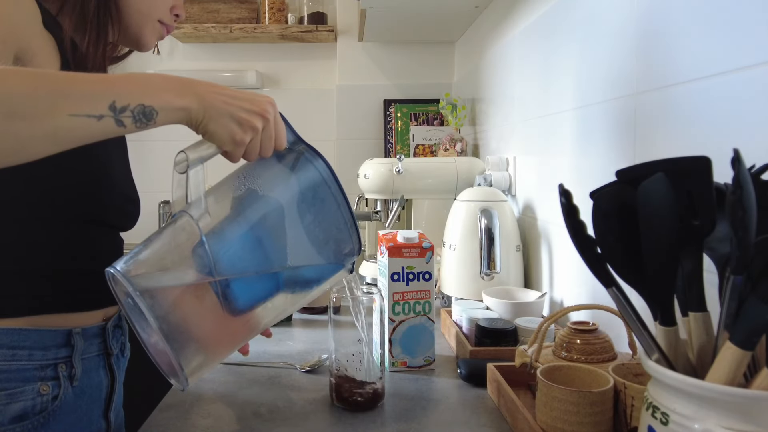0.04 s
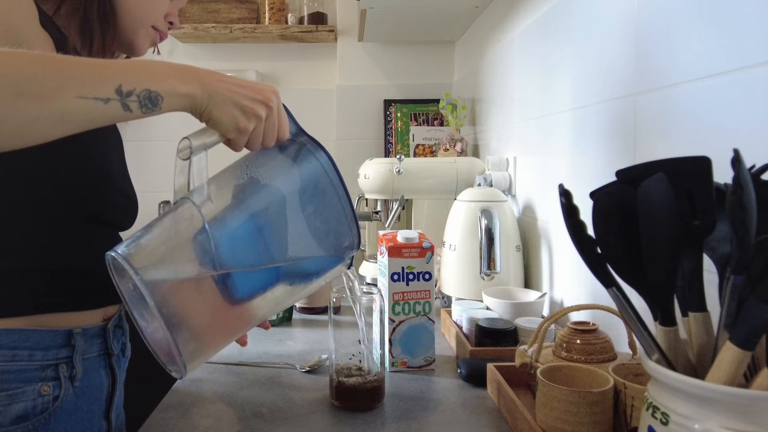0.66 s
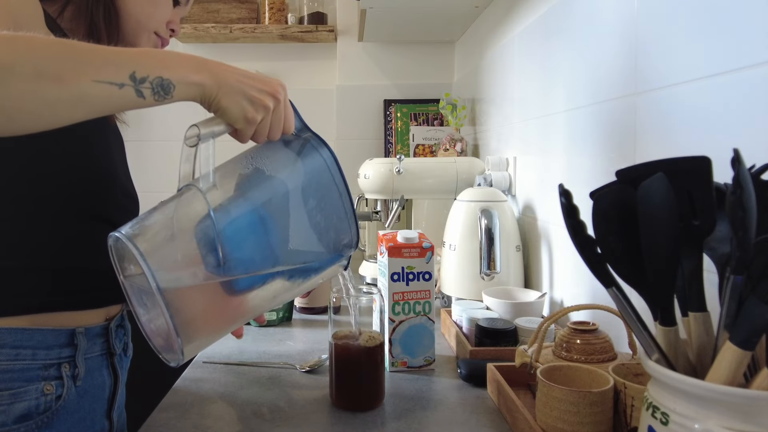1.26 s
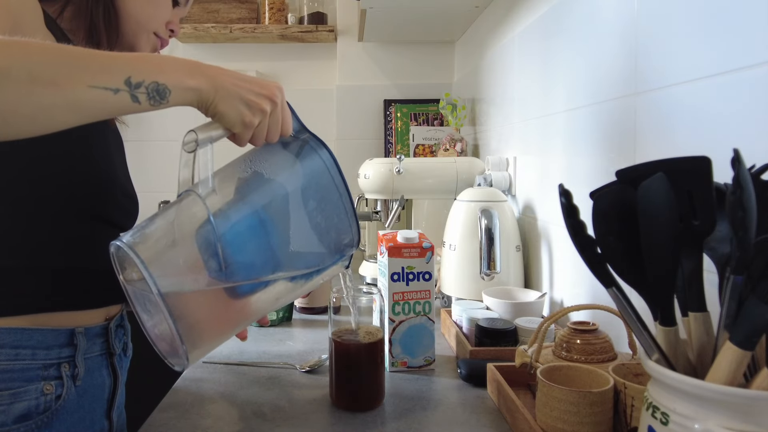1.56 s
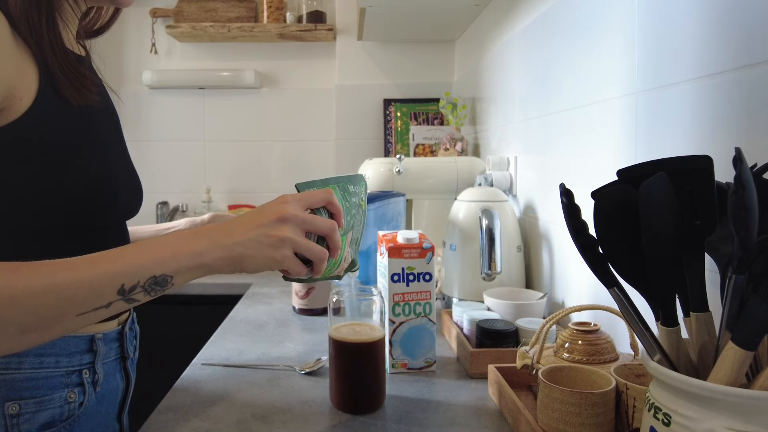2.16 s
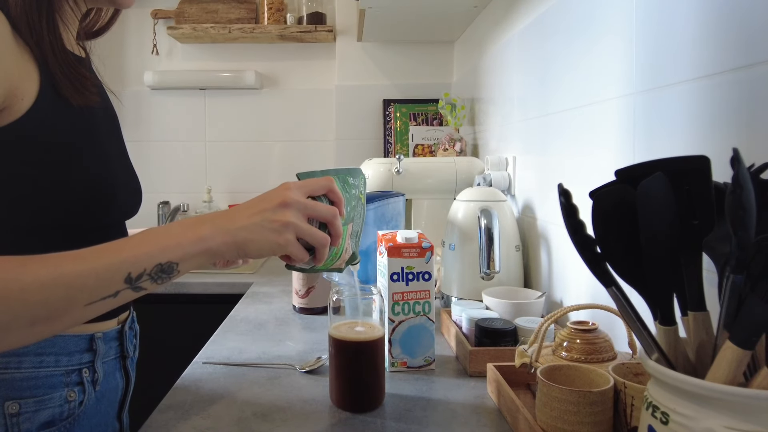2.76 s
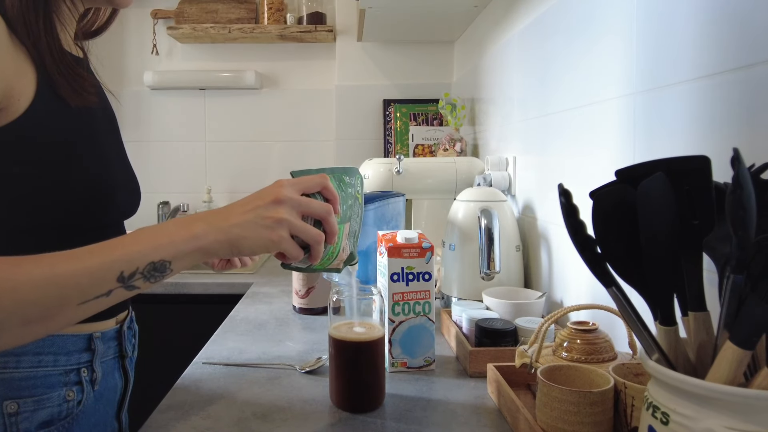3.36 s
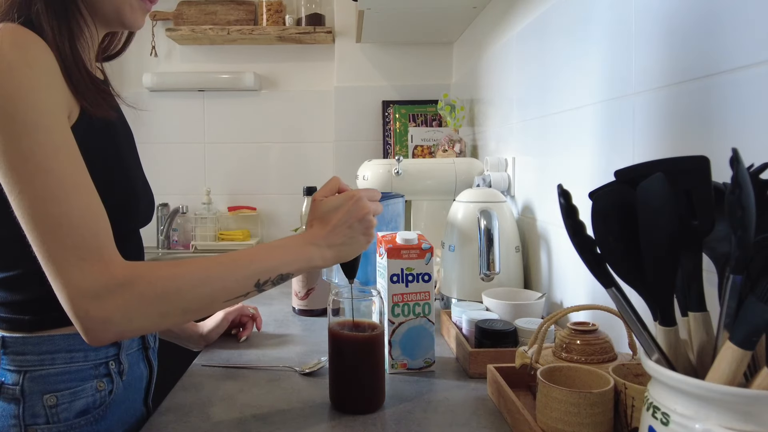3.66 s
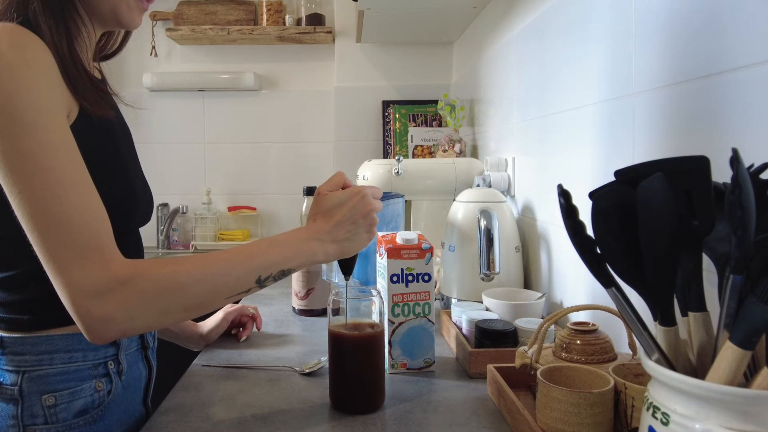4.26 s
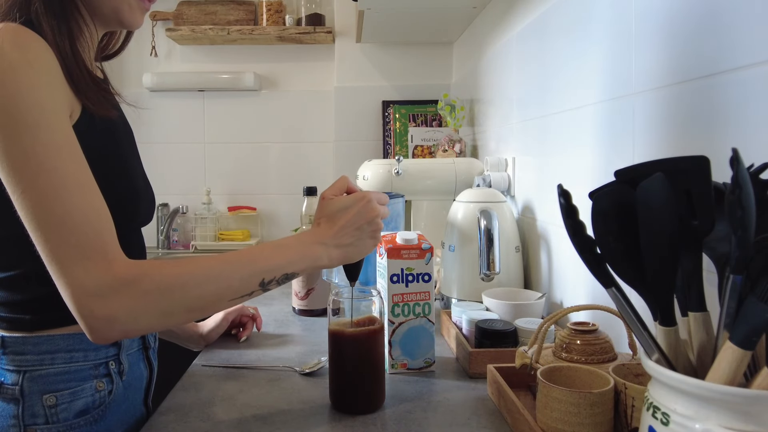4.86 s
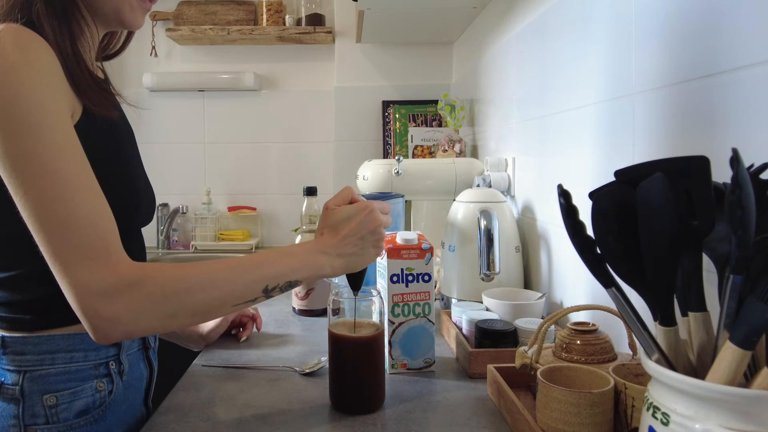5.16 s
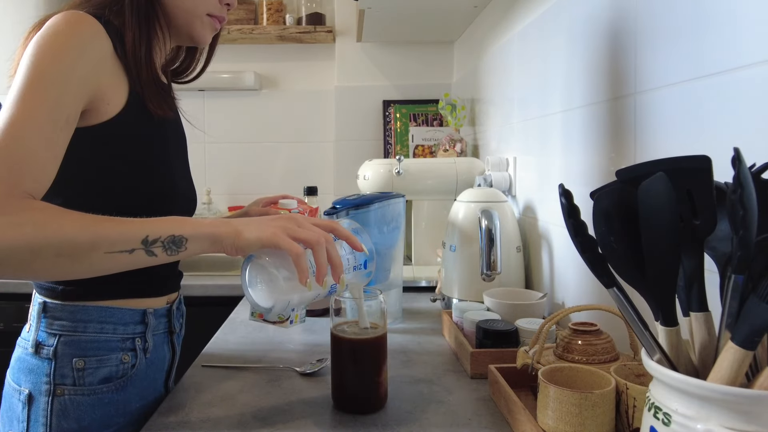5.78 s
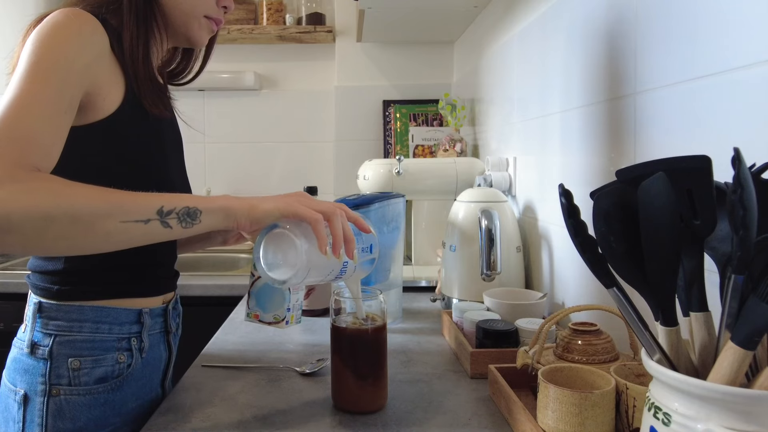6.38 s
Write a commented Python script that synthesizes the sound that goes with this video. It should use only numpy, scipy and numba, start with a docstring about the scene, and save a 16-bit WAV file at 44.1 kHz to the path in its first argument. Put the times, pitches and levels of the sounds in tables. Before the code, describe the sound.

Water splashes and gurgles into a tall glass jar, rising in pitch as it fills, with sharp droplets. It cuts off, and powder trickles in with a faint whisper. The drink is then whisked to a hissing froth in two passes, with dull bumps. Finally a tumbler knocks against the jar several times and gives one short clink. The sounds are close, in a small tiled kitchen with a faint low rumble.

```python
"""Iced coffee on a kitchen counter

Water splashes and gurgles into a tall glass jar, whose air column rises in pitch as it fills.
Powder trickles in, the drink is whisked to a hissing froth, then a tumbler knocks and clinks
against the jar. Each step starts and stops abruptly; a small tiled room rings over a low rumble."""
import sys
import numpy as np
from scipy import signal
from scipy.fft import rfft, irfft, next_fast_len
from scipy.io import wavfile
from numba import njit

SR = 44100
rng = np.random.default_rng(int(sys.argv[2]) if len(sys.argv) > 2 else 0)


def transcribe(u):
    """Save the signal u as a 16-bit wav file named by the first command-line argument.

    u: samples, shape (n,) or (channels, n), limited to [-1, 1]; the rate is SR.
    q: integer samples, one column per channel.
    """
    v = np.clip(np.atleast_2d(u).T, -1, 1)
    q = np.round(v * 32767).astype(np.int16)
    wavfile.write(sys.argv[1], SR, q)


N = 292383

# quarter-wave resonance of the air above the drink: time_s, pitch_hz
AIR_PITCH = [(0, 527), (.36, 598), (.7, 602), (.98, 668), (1.02, 900), (1.28, 876), (1.42, 947),
             (1.95, 1025)]
# modes of the jar's glass wall: pitch_hz, width_hz, gain_db
GLASS_MODES = [(1865, 140, -4), (2830, 49, 8.5), (3156, 74, 6.5), (3240, 36, -10), (4280, 130, 0.5)]


def amp(db):
    """Decibels to gain."""
    return 10 ** (np.asarray(db) / 20)


def unit(x):
    """x at rms 1."""
    return x / np.sqrt(np.mean(x ** 2) + 1e-20)


def peak(x):
    """x with its peak at 1."""
    return x / (np.abs(x).max() + 1e-20)


def along(points, hz):
    """Read (freq_hz, value) points on a log frequency axis."""
    freqs, values = np.transpose(points)
    return np.interp(np.log(hz + 1), np.log(freqs), values)


def curves(rows):
    """One automation curve for each column after the time."""
    times, *columns = np.transpose(rows)
    return [np.interp(np.arange(N) / SR, times, column) for column in columns]


def during(start_s, stop_s):
    """A gate with 8 ms ramps."""
    t = np.arange(N) / SR
    return np.clip(np.minimum(t - start_s, stop_s - t) / .008, 0, 1)


def add(track, start_s, sound):
    """Mix a sound into a track."""
    part = track[..., max(round(start_s * SR), 0):][..., :sound.shape[-1]]
    part += sound[..., :part.shape[-1]]


def colour(x, eq):
    """Minimum-phase EQ through (freq_hz, gain_db) points."""
    n = x.shape[-1]
    size = 2 * next_fast_len(n // 2 + 4096)
    cepstrum = irfft(np.log(amp(along(eq, np.fft.rfftfreq(size, 1 / SR)))))
    cepstrum[1:size // 2] *= 2
    cepstrum[size // 2 + 1:] = 0
    return irfft(rfft(x, size) * np.exp(rfft(cepstrum)), size)[..., :n]


def resonate(x, modes):
    """x through parallel resonances: pitch_hz, width_hz, gain_db."""
    size = next_fast_len(N + 8192)
    f = np.fft.rfftfreq(size, 1 / SR)
    response = sum(amp(db) * 1j * f * width / (hz * hz - f * f + 1j * f * width)
                   for hz, width, db in modes)
    return irfft(rfft(x, size) * response, size)[:N]


@njit
def glide(x, step, radius):
    """A one-pole resonator, retuned every sample."""
    y, z = np.zeros(len(x)), 0j
    for i in range(len(x)):
        z = z * radius * step[i] + 2 * (1 - radius) * x[i]
        y[i] = z.real
    return y


def moving_ring(x, hz, width_hz):
    """x through one resonance that follows a pitch curve."""
    return glide(x, np.exp(2j * np.pi * hz / SR), np.exp(-np.pi * width_hz / SR))


def wavering(hz, stray=.06):
    """A pitch curve that strays at random every 2048 samples."""
    return hz * np.exp(stray * rng.standard_normal(N // 2048 + 1).repeat(2048)[:N])


def wide(source, shared):
    """A stereo texture of rms 1: partly common to both ears, partly each ear's own."""
    return unit(shared * source() + np.array([source(), source()]))


def crackle(per_s, spread_db, smooth):
    """Random tiny impacts of uneven size over a share of smooth noise."""
    hits = rng.random(N) < per_s / SR
    sizes = amp(spread_db * np.minimum(rng.exponential(size=N), 3))
    signs = np.sign(rng.standard_normal(N))
    return unit(hits * sizes * signs) + smooth * rng.standard_normal(N)


def ring(modes, attack_s):
    """One strike on a set of modes: pitch_hz, level_db, t60_s."""
    t = np.arange(SR // 2) / SR
    waves = sum(amp(db + rng.normal(0, 1) - 60 * t / t60_s) * np.sin(2 * np.pi * hz * t)
                for hz, db, t60_s in modes)
    return waves * (1 - np.exp(-t / attack_s))


def burst(eq, t60_s):
    """A dying puff of coloured noise."""
    t = np.arange(SR // 2) / SR
    return colour(amp(-60 * t / t60_s) * rng.standard_normal(len(t)), eq)


def room(x, send_db):
    """The tiled kitchen: direct sound plus a diffuse stereo tail, boosted most in the treble."""
    # reverb time: freq_hz, t60_s
    decay = [(100, 0.43), (1200, 0.64), (4000, 0.5), (12000, 0.24)]
    hz, t, noise = signal.stft(rng.standard_normal((2, SR // 2)), SR, nperseg=256)
    side = noise[1] * np.minimum(hz / 650, 1)[:, None]  # long waves reach both ears alike
    early = 1 + 1.25 * np.exp(-t / .0099)  # counter and wall are close
    ears = np.array([noise[0] + side, noise[0] - side]) * early
    ears *= amp(-60 * t / along(decay, hz)[:, None])
    tail = np.pad(signal.istft(ears, SR, nperseg=256)[1], ((0, 0), (SR // 500, 0)))  # 2 ms pre-delay
    tail *= amp(send_db) / np.linalg.norm(tail[0])
    tail = colour(tail, [(3000, 5.1), (9000, 11.4)])  # tiles throw the treble back
    tail[:, 0] = 1  # direct sound
    return signal.fftconvolve(x[None], tail, axes=1)[:, :len(x)] / np.sqrt(1 + amp(send_db) ** 2 / 2)


def room_tone():
    """A low rumble, nearly alike at both ears, under a faint hush."""
    # spectra of the two beds: freq_hz, gain_db
    rumble_eq = [(27, 0.5), (65, -13.5), (105, -6.5), (150, -25.5), (250, -33), (600, -78.5)]
    hush_eq = [(100, -5.5), (200, -7.5), (340, -16.5), (1000, -23.5), (3500, -22.5), (12000, -32)]
    # the rumble's slow swells: time_s, level_db
    swells = [(0, -57), (1.8, -50.5), (3.1, -57), (3.8, -50), (6.6, -57)]
    rumble = wide(lambda: colour(rng.standard_normal(N), rumble_eq), shared=13.5)
    hush = wide(lambda: colour(rng.standard_normal(N), hush_eq), shared=.9)
    return amp(curves(swells)[0]) * rumble + amp(-63.5) * hush


def powder():
    """Fine grains whisper into the jar; small clumps land and faintly sound its air."""
    # hiss of sliding grains: freq_hz, gain_db
    grit_eq = [(400, -20), (1600, -2), (6000, -3), (10000, -9)]
    # the trickle: time_s, level_db
    trickle = [(2.0, -50.5), (2.154, -59.5), (2.92, -67), (3.104, -61), (3.47, -61)]
    hiss = wide(lambda: colour(rng.standard_normal(N), grit_eq), shared=.45)
    landings = crackle(per_s=40, spread_db=1, smooth=.2)
    air = moving_ring(landings, wavering(curves(AIR_PITCH)[0]), width_hz=50)
    clumps = unit(room(air, send_db=0)) * during(2.25, 3.5)
    return amp(curves(trickle)[0]) * hiss * during(1.965, 3.5) + amp(-69.5) * clumps


def clinks():
    """After a soft low nudge, the tumbler's rim ticks on the jar, then rings."""
    # rim contacts: start_s, ring_db, tick_db, tick_hz
    contacts = [(6.163, -55, -43.5, 3080), (6.180, -34, -41.5, 2340)]
    # the tumbler's modes: pitch_hz, level_db, t60_s
    tumbler_modes = [(108.2, -11.5, 0.46), (269, -9, 0.1), (1221, -8, 0.15), (1287, -2, 0.048)]
    track = np.zeros(N)
    for start_s, ring_db, tick_db, hz in contacts:
        tick = peak(burst([(300, 0), (hz * .75, -9), (hz, 2), (4200, -28), (12000, -50)], t60_s=.03))
        add(track, start_s, amp(ring_db) * ring(tumbler_modes, attack_s=.0007) + amp(tick_db) * tick)
    nudge = ring([(282.4, 0, .19)], attack_s=.018)
    add(track, 6.13, amp(-47) * nudge)
    return room(track, send_db=-3.5)


def blow(ring_db, thump_db, rattle_db):
    """A blow thuds through jar and counter, and the contact rattles."""
    # modes of the jar on the counter: pitch_hz, level_db, t60_s
    thud_modes = [(91, -14.5, 0.12), (121.5, -18.5, 0.15), (295, -6.5, 0.084), (528, 0, 0.082),
                  (558, -10.5, 0.065), (1013, -3, 0.023)]
    # spectra of the impact noises: freq_hz, gain_db
    thump_eq = [(60, -16), (125, -6), (190, 1.5), (260, -11), (450, -6), (750, -18), (1100, -6.5),
                (2000, -33.5), (8000, -42.5)]
    rattle_eq = [(100, -10), (1200, 0), (2900, -2), (3800, -20), (15000, -42)]
    body = amp(ring_db) * ring(thud_modes, attack_s=.0026)
    thump = amp(thump_db) * peak(burst(thump_eq, t60_s=.1))
    rattle = amp(rattle_db) * peak(burst(rattle_eq, t60_s=.02))
    return room(np.pad(body + thump + rattle, (0, SR // 2)), send_db=-4.5)


def knocks():
    """The whisk bumps the jar dully; the tumbler makes it ring, its hardest blow with a glassy click."""
    # whisk on jar: start_s, thump_db
    whisk_bumps = [(3.928, -39), (4.513, -25)]
    # tumbler on jar: start_s, ring_db, rattle_db
    tumbler_hits = [(5.535, -34, -70), (5.545, -18.5, -47), (5.562, -24, -64), (5.620, -29.5, -70),
                    (5.656, -31.5, -31), (5.737, -42.5, -38)]
    track = np.zeros((2, N))
    for start_s, thump_db in whisk_bumps:
        add(track, start_s, blow(thump_db - 7, thump_db, thump_db - 4.5))
    for start_s, ring_db, rattle_db in tumbler_hits:
        add(track, start_s, blow(ring_db, ring_db - 12.5, rattle_db))
    hardest_s = max(tumbler_hits, key=lambda hit: hit[1])[0]
    click = burst([(5500, 4.5), (7500, -5), (14000, -8)], t60_s=.017)
    add(track, hardest_s, amp(-42.5) * room(click, send_db=-1.5))
    return track


def whisk():
    """Whisking tears the surface into froth and spray, rings the jar's wall and shakes the counter."""
    # fader rides for two passes, ahead of the mix trims: time_s, churn_db, froth_db, spray_db
    passes = [
        [(3.5, -57.5, -49.5, -58), (3.69, -63.5, -57.5, -60), (3.905, -52.5, -51, -58),
         (3.928, -41.5, -42, -62), (3.99, -43.5, -49.5, -53.5), (4.2, -68, -69.5, -87)],
        [(4.25, -71, -69, -70), (4.288, -61, -57.5, -60), (4.42, -45.5, -44.5, -53), (4.55, -46.5, -43.5, -43),
         (4.72, -46, -42, -40.5), (4.83, -38.5, -38, -44), (4.92, -47, -48, -57.5), (5.11, -67, -64, -82),
         (5.33, -72, -61, -62)],
    ]
    # spectra of the torn surface: freq_hz, gain_db
    froth_eq = [(200, -8), (800, -1.5), (2400, -2.5), (4600, 0.5), (6600, -3.5), (15000, -24)]
    spray_eq = [(3000, -35), (7000, 3), (15000, 6.5)]
    # a thin ring in the froth climbs, then wanders: time_s, pitch_hz
    thin_pitch = [(3.55, 2500), (3.88, 3310), (4.35, 3030), (4.8, 3150), (5.05, 2730)]
    # resonances of the counter and of a closing whistle: pitch_hz, width_hz, gain_db
    counter_modes = [(117.4, 21, 7), (173, 17, 2.5), (290, 28, 4), (519, 33, 7.5), (1000, 71, 4),
                     (1263, 48, 0)]
    whistle_modes = [(6050, 200, 0), (11000, 900, -5)]
    fizz = lambda: crackle(per_s=7000, spread_db=3, smooth=.8)
    froth = wide(lambda: colour(fizz(), froth_eq), shared=.75)
    glass = resonate(crackle(per_s=1500, spread_db=1.5, smooth=.27), GLASS_MODES)
    wall = unit(room(glass, send_db=-12))
    spray = wide(lambda: colour(fizz(), spray_eq), shared=.14)
    counter = resonate(crackle(per_s=900, spread_db=2, smooth=.088), counter_modes)
    churn = unit(room(colour(counter, [(1400, 2.5), (3000, -12)]), send_db=-2))
    thin = wide(lambda: moving_ring(fizz(), wavering(curves(thin_pitch)[0]), width_hz=105), shared=.85)
    hiss = amp(1.5) * froth + amp(-6.5) * thin + amp(-7) * wall
    churn_db, froth_db, spray_db = curves(np.vstack(passes))
    mix = amp(froth_db) * hiss + amp(spray_db + 3.5) * spray + amp(churn_db + 1.5) * churn
    add(mix, 3.613, amp(-42) * ring([(2400, 0, .028)], attack_s=.002))  # one larger bubble pops
    whistle = wide(lambda: resonate(fizz(), whistle_modes), shared=1)
    return mix * during(3.494, 5.342) + amp(-60) * whistle * during(5.17, 5.34)


def droplets():
    """Single droplets snap on the glass and ping at their own pitch."""
    # the loudest droplets: start_s, level_db, pitch_hz, edge_db
    hits = [(0.0292, -27, 3270, -33), (0.056, -31, 5250, -33), (0.086, -30.5, 5600, -58),
            (0.1368, -25, 5000, -52), (.188, -23, 3370, -56), (0.2563, -22, 4300, -56),
            (0.4234, -20, 5450, -25.5), (0.4932, -26.5, 3030, -20), (0.6727, -24, 3000, -33.5),
            (0.824, -27.5, 3350, -53), (.876, -37, 3040, -36.5), (.914, -35, 2800, -42),
            (.971, -28, 3040, -35), (1.1459, -29, 5100, -33), (1.304, -29.5, 3670, -39),
            (1.4222, -27, 4160, -61), (1.514, -41, 3140, -43), (1.5585, -34, 2740, -44),
            (1.6228, -32.5, 4800, -62), (1.765, -40.5, 3270, -56), (1.8927, -43, 6100, -33)]
    track = np.zeros(N)
    for start_s, level_db, hz, edge_db in hits:
        ping = ring([(hz, 0, .011)], attack_s=.0002)
        snap = peak(burst([(hz / 3, -12), (hz, 0), (hz * 1.3, -5), (hz * 2, -24)], t60_s=.022))
        edge = peak(burst([(3000, -16), (9000, .5), (15000, -3.5)], t60_s=.011))
        add(track, start_s, amp(level_db) * (amp(-9) * ping + amp(-2) * snap) + amp(edge_db) * edge)
    return room(track, send_db=-5) * during(-1, 1.975)


def gulps():
    """Big pockets of air, driven under the surface, gulp and sound the jar's air column."""
    # air pockets: start_s, level_db
    pockets = [(.519, -35.5), (0.667, -31.5), (.702, -30.5), (.975, -25.5), (1.053, -30.5), (1.145, -29),
               (1.385, -30), (1.421, -29.5), (1.515, -30), (1.818, -32), (1.944, -33.5)]
    # a gulp's low body: pitch_hz, level_db, t60_s
    body_modes = [(118.3, -5, 0.1), (514, -3, 0.046)]
    track = np.zeros(N)
    for start_s, level_db in pockets:
        air_hz = np.interp(start_s, *np.transpose(AIR_PITCH))
        body = ring(body_modes + [(air_hz, -5, .035), (3 * air_hz, -14.5, .035)], attack_s=.0008)
        splat = peak(burst([(1100, -.5), (3000, -13), (7000, -27)], t60_s=.043))
        add(track, start_s, amp(level_db) * (body + .5 * splat))
    return room(track, send_db=-3.5) * during(-1, 1.975)


def bubbles(hz, scatter, cycles, rise, spread_db, count, samples):
    """Bubbles over the first 2 s: sines that rise in pitch and fall to 1/e in `cycles` periods."""
    when, tuning, size = np.hsplit(rng.random((count, 3)), 3)
    pitch_hz = hz * np.exp(scatter * (2 * tuning - 1))
    phase = pitch_hz * np.arange(samples) / SR
    age = phase / cycles
    gain = amp(-spread_db * np.log(np.maximum(size, .04)))
    waves = gain * np.exp(-age) * np.sin(2 * np.pi * phase * (1 + rise * np.minimum(age, 2)))
    at = (when * 2 * SR).astype(int) + np.arange(samples)
    return unit(np.bincount(at.ravel(), waves.ravel(), N)) * np.sqrt(2 * SR / N)


def air_column(x, harmonic, width_hz):
    """The air above the drink rings at an odd multiple of its quarter-wave pitch."""
    return moving_ring(x, harmonic * curves(AIR_PITCH)[0], width_hz)


def slosh(end_s=1.005, swell_db_per_s=23):
    """A low slosh swells under the early pour, then stops abruptly."""
    # spectrum of shallow water: freq_hz, gain_db
    slosh_eq = [(220, -24), (310, 2.5), (420, -6), (480, -8), (800, -44)]
    water = colour(crackle(per_s=310, spread_db=5.5, smooth=.25), slosh_eq)
    level_db = -45.5 + swell_db_per_s * np.minimum(np.arange(N) / SR - end_s, 0)
    return amp(level_db) * unit(room(water, send_db=-7)) * during(-1, end_s)


def pour():
    """The stream splashes, traps bubbles and drums on the counter: less splash, more drum as it fills."""
    # how hard the stream plunges: time_s, gurgle_db
    plunge = [(.04, -64), (.22, -49.5), (.47, -48.5), (.53, -40), (.97, -40.5), (1.07, -46.5), (1.26, -42),
              (1.36, -46.5), (1.41, -41), (1.79, -47), (1.835, -46), (1.96, -40)]
    # spectra of surface, trapped air and counter: freq_hz, gain_db
    splash_eq = [(400, -5.5), (1500, 1.5), (2500, -17), (2950, 2.5), (3700, -9), (5400, -1.5), (7000, -9),
                 (15500, -6)]
    gurgle_eq = [(330, -18), (480, -4.5), (545, -1), (700, -14.5), (1300, -8), (2500, -20), (6000, -82)]
    thrum_eq = [(30, -25), (85, -2.5), (122, 2.5), (160, -8), (195, -6), (330, -71)]
    plunge_db = curves(plunge)[0]
    air_cm = 34300 / curves(AIR_PITCH)[0] / 4  # a quarter wavelength; sound speed in cm/s
    depth_cm = air_cm[0] - air_cm
    flowing = during(-1, 1.972)

    def stream(x, send_db):
        """A layer in the room, gated to the pour and near rms 1 while it flows."""
        return unit(room(x, send_db) * flowing) * np.sqrt(flowing.mean())

    def fader(empty_db, db_per_cm, plunge_share):
        """A gain that follows the water's depth and the force of the plunge."""
        return amp(empty_db + db_per_cm * depth_cm + plunge_share * (plunge_db - plunge_db.mean()))

    hiss = .52 * rng.standard_normal(N)
    fizz = bubbles(hz=4400, scatter=.5, cycles=3.2, rise=.05, spread_db=5.3, count=950, samples=500)
    splash = stream(colour(hiss + fizz, splash_eq), send_db=-5)
    tiny = bubbles(hz=7000, scatter=.75, cycles=1.6, rise=.02, spread_db=5.6, count=460, samples=200)
    drips = stream(tiny, send_db=-4)
    medium = bubbles(hz=1800, scatter=.25, cycles=7, rise=.03, spread_db=4, count=330, samples=1000)
    hollow = stream(air_column(medium, harmonic=3, width_hz=260), send_db=-2)
    large = bubbles(hz=600.2, scatter=.825, cycles=4.8, rise=.037, spread_db=-1.5, count=900,
                    samples=1600)
    trapped = colour(large + crackle(per_s=1300, spread_db=20, smooth=.067), gurgle_eq)
    gurgle = stream(trapped + amp(13) * air_column(trapped, harmonic=1, width_hz=65), send_db=-4)
    thrum = stream(colour(crackle(per_s=260, spread_db=-2, smooth=1), thrum_eq), send_db=-7)
    wall = stream(resonate(crackle(per_s=300, spread_db=6, smooth=.2), GLASS_MODES), send_db=-19)
    return (gurgle * amp(plunge_db)
            + splash * fader(empty_db=-36, db_per_cm=-2.66, plunge_share=.26)
            + drips * fader(empty_db=-46.5, db_per_cm=-1.67, plunge_share=.31)
            + hollow * fader(empty_db=-46.5, db_per_cm=-1.33, plunge_share=.12)
            + wall * fader(empty_db=-46.5, db_per_cm=-1.9, plunge_share=.66)
            + thrum * fader(empty_db=-50.5, db_per_cm=.79, plunge_share=.27))


def scene():
    """Water, powder, whisk and glassware over the room tone."""
    water = pour() + slosh() + droplets() + gulps()
    return water + powder() + whisk() + knocks() + clinks() + room_tone()


def record(dry):
    """A brick-wall low-pass takes off the very top of the treble."""
    cutoff_hz = 15850
    size = next_fast_len(N + 8192)
    passband = np.fft.rfftfreq(size, 1 / SR) < cutoff_hz
    return irfft(rfft(dry, size) * passband, size)[:, :N]


dry = scene()
out = record(dry)
transcribe(out)
```